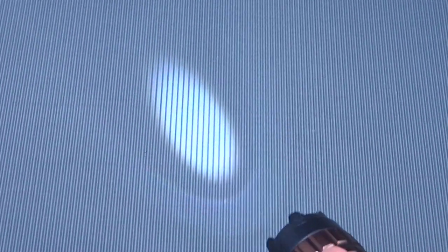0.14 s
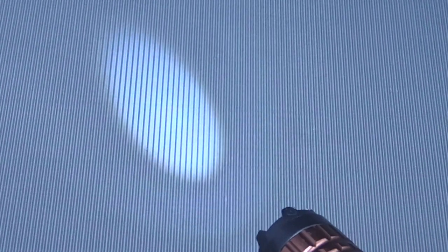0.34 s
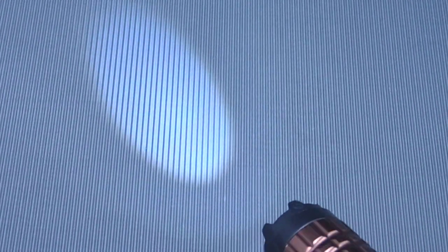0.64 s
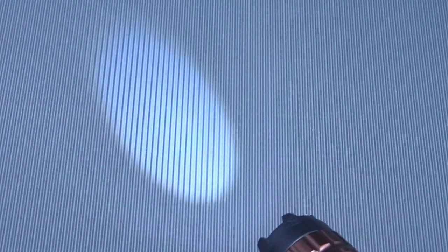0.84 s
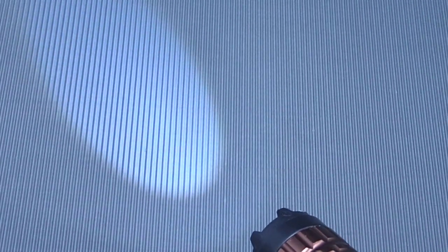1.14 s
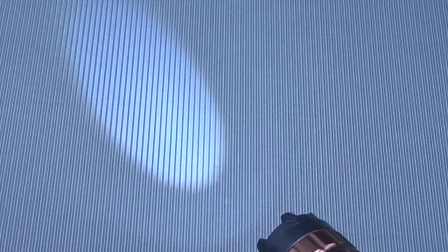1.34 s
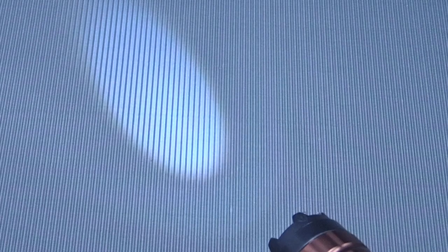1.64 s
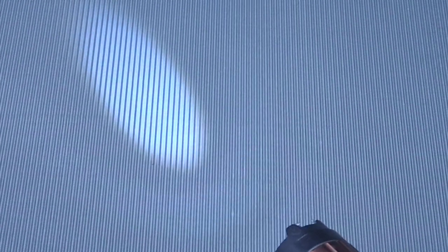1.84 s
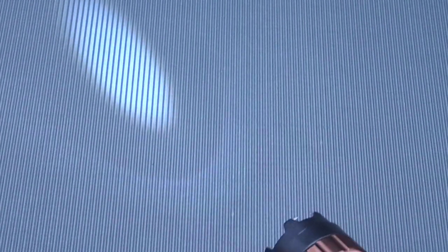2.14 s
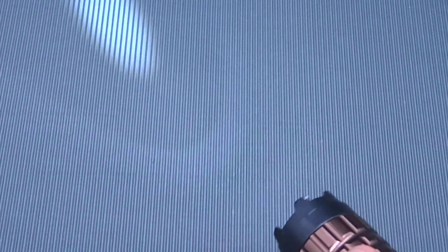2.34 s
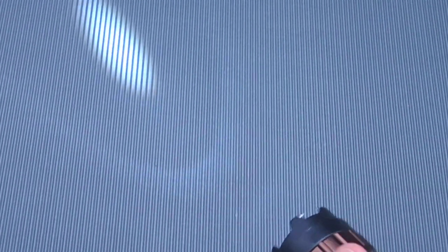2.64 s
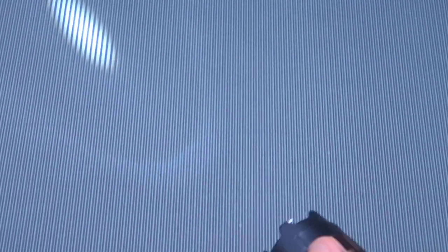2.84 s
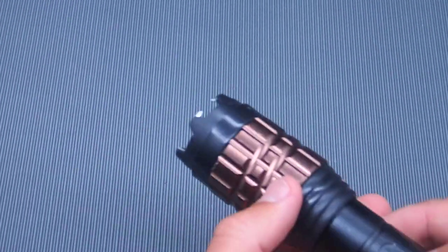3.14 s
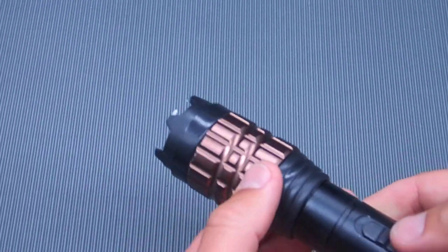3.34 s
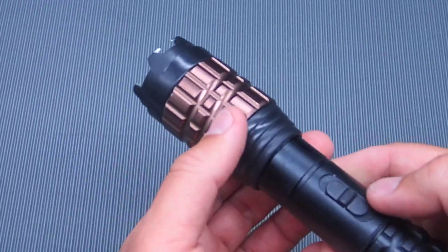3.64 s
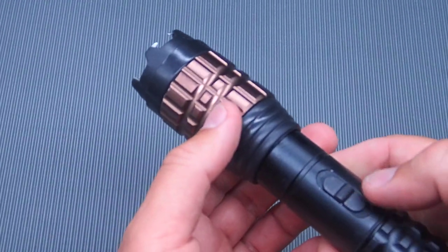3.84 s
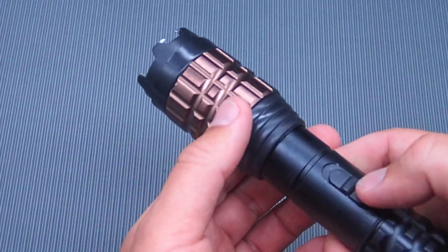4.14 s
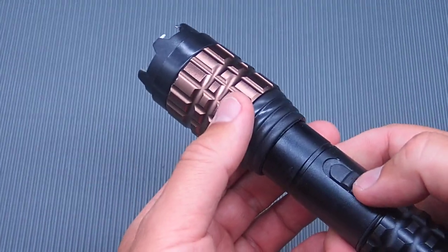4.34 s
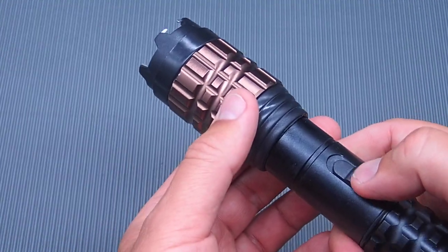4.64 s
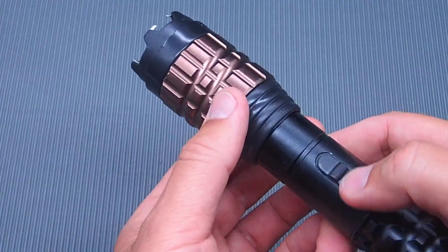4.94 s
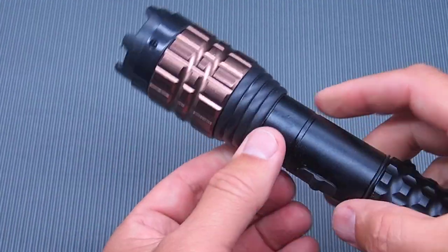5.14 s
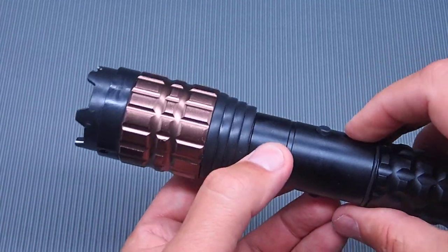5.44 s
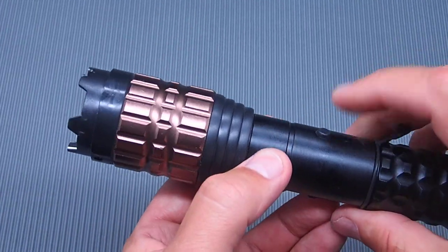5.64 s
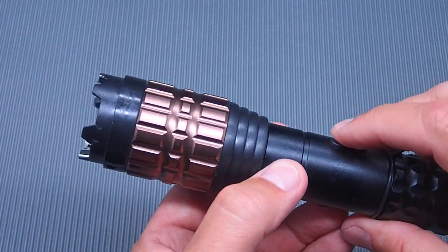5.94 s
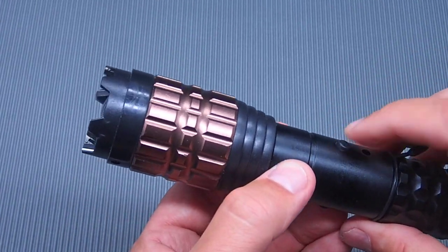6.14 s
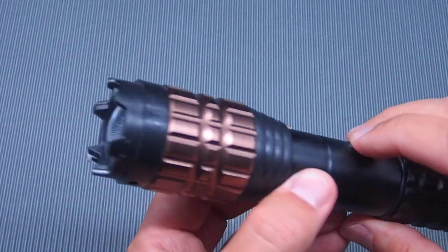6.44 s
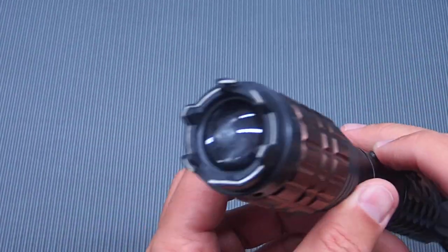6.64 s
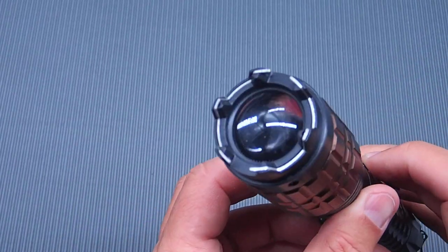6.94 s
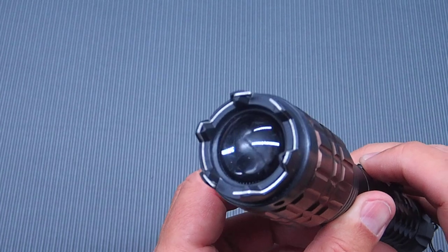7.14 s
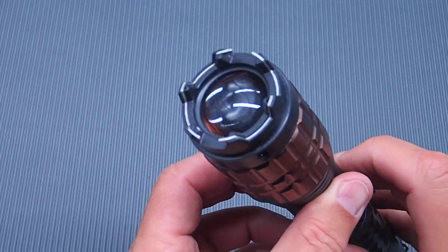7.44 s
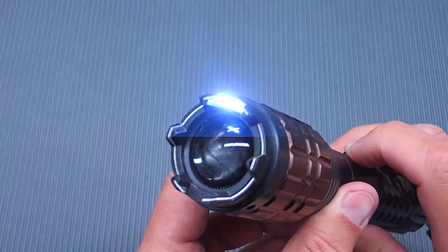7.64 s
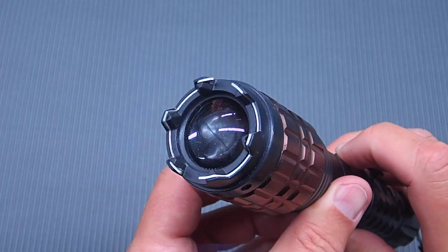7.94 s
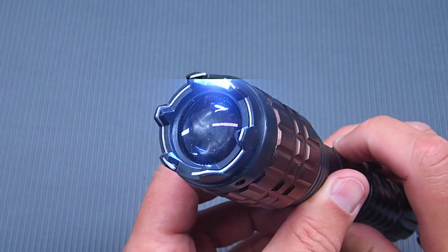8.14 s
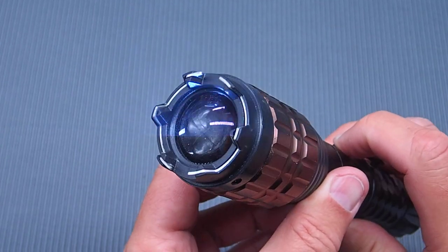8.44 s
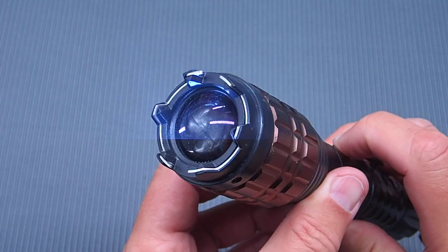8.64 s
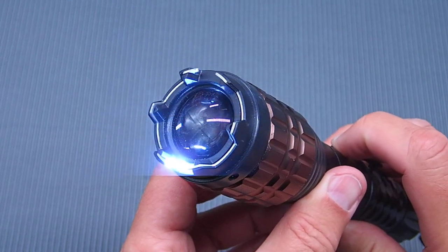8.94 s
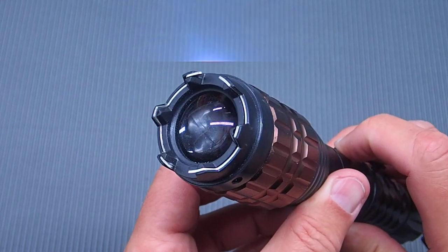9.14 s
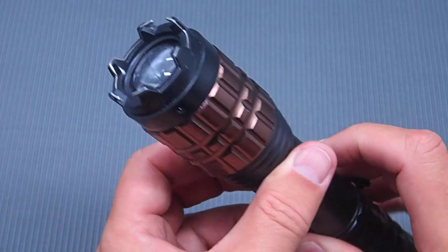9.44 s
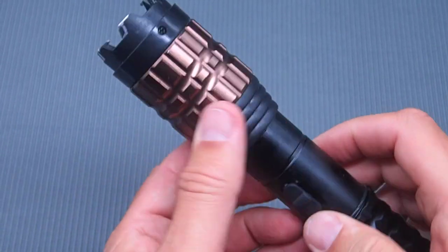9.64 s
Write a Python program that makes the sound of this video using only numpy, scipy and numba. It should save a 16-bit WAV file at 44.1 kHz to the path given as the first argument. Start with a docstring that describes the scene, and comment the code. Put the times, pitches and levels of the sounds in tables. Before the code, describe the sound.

From about 0.2 to 2.8 seconds, the focus ring of a stun gun flashlight is twisted eight times, each twist a quick cluster of bright, scratchy ticks, with a few light clicks on the barrel among them. Around 3 to 3.5 seconds, fingers slide softly along the barrel with a small tap. A slide switch snaps sharply at 4.7 seconds. From 5 to 7 seconds there are faint rubs and light taps as the grip shifts. Just after 7 seconds the trigger clicks and the stun gun fires at once: a hard first crack, then a loud, bright electric crackle of some forty sparks a second, steady and buzzing, with a slight thump beneath. It is by far the loudest sound and cuts off at 9.4 seconds, leaving faint hiss. Everything is close to the microphone in a small, quiet room.

```python
"""A stun gun built into a torch sparks some 43 times a second, close by in a small, quiet room.
Each time its capacitor fills, the air in the gap breaks down with a crack and a low thump.
Before the arc starts, the focus ring ticks through eight short twists by stick-slip friction,
a slide switch snaps, fingers shift their grip and the trigger clicks.
A limiter ducks the room noise under each loud sound."""
import sys
import numpy as np
from scipy import signal
from scipy.fft import rfft, irfft, next_fast_len
from scipy.io import wavfile
from numba import njit

SR = 44100
rng = np.random.default_rng(int(sys.argv[2]) if len(sys.argv) > 2 else 0)


def dump(signal):
    """Clip the signal to [-1, 1] and save it as 16-bit WAV at the path in sys.argv[1]."""
    limited = np.clip(np.atleast_2d(signal).T, -1, 1)
    pcm = np.round(limited * 32767).astype(np.int16)
    wavfile.write(sys.argv[1], SR, pcm)


N = 432621
TIME = np.arange(N) / SR
TAIL = TIME[:SR // 3]  # time axis of one short sound
FFT_SIZE = next_fast_len(N + SR)
FREQ = np.maximum(np.arange(FFT_SIZE // 2 + 1) * SR / FFT_SIZE, 1)

# spectrum of room air and microphone hiss: (frequency [Hz], relative level [dB])
AIR_SPECTRUM = [(25, 4), (91, 3), (220, 0), (537, -2), (1200, -5.5), (1650, -7), (1900, -13.5), (2770, -18),
                (3170, -14.5), (4200, -25), (4750, -7.5), (6500, -9.5), (8000, -6), (9500, -13),
                (15500, -15)]
# microphone response, with its strong port resonance: (frequency [Hz], gain [dB])
MIC_RESPONSE = [(30, -32.5), (400, -34.5), (1300, -25.5), (1900, -26.5), (3100, -24), (4220, -22),
                (4600, -9.5), (5100, -0.5), (5650, 1.5), (6700, -6), (7950, -8), (9300, -15.5),
                (11400, -17.5), (15300, -17)]
# stereo width of the room and of near sounds: (frequency [Hz], side relative to mid [dB])
ROOM_WIDTH = [(60, -7), (200, -2), (700, -0.5), (2400, -2), (4400, -1.5), (8000, 1), (15000, -0.5)]
NEAR_WIDTH = [(100, -2), (400, 0), (1300, -2.5), (2500, -12), (5200, -8), (8000, -3), (13000, -1)]
# a faint tick dying away at the very start, then strokes of skin along the barrel:
# (time [s], length [s], relative level [dB])
TICK_AND_STROKES = [(0, 0.0071, -45.5), (2.979, 0.2, -45), (3.3, 0.17, -47.5), (5.185, 0.15, -46),
                    (5.42, .03, -59), (5.82, .015, -47.5), (5.98, .03, -54), (6.48, .05, -52),
                    (6.61, 0.18, -48), (6.863, .05, -55)]
# snaps and taps on the barrel: (time [s], relative level [dB], decay time [s], knock against snap [dB])
BARREL_CLICKS = [(.551, -25, 0.0036, -25), (1.851, -27.5, 0.0079, -14.5), (2.171, -27.5, 0.0034, -15),
                 (2.611, -25.5, 0.0089, -20), (3.348, -29.5, 0.0037, -10), (4.6832, -7, 0.006, -53),
                 (4.688, -16.5, 0.0023, -49), (4.957, -44, 0.0071, -18), (5.208, -36, 0.0074, -18),
                 (5.224, -41, .004, -6), (5.819, -38, 0.0057, -9), (5.98, -41, .005, -22),
                 (6.074, -33.5, 0.0073, -36), (6.299, -31, 0.005, -8), (6.745, -51, 0.0076, 4),
                 (6.829, -30.5, 0.0094, -1.5), (7.0424, -13.5, 0.0025, -21), (7.048, -20, .005, -22)]
# twists of the focus ring:
# (tick level [dB], change from first tick to last [dB], drag level [dB], tick times [s])
TWISTS = [(-5.5, -3, -19.5, (.216, .235, .255, .303, .372)), (-3, -0.5, -11.5, (.595, .614, .637, .673)),
          (-0.5, -4.5, -19, (.893, .913, 0.94)),
          (-8, 4.5, -36.5, (1.249, 1.289, 1.337, 1.359, 1.383, 1.424)),
          (-5.5, -2, -19, (1.681, 1.710, 1.742, 1.781)), (-9, 2.5, -22, (2.009, 2.037, 2.070, 2.100)),
          (-6.5, -8.5, -23, (2.334, 2.355, 2.384, 2.425)), (-8, -3.5, -20, (2.652, 2.684, 2.711))]
# modes of the barrel and of the ring: (frequency [Hz], bandwidth [Hz], relative gain [dB])
BARREL_MODES = [(1520, 460, 10), (3600, 4100, 8), (5100, 320, 2), (6400, 3100, -1), (9200, 1400, -44.5),
                (15000, 2000, -6.5)]
RING_MODES = [(850, 74, 8.5), (1510, 1100, 0.5), (3050, 210, -3), (4520, 114, 3.5), (5220, 310, 8.5),
              (6160, 5700, -0.5), (12890, 810, 7.5)]
# crown and microphone port modes rung by sparks: (frequency [Hz], bandwidth [Hz], relative gain [dB])
ARC_MODES = [(5180, 300, -17), (5720, 30, -1), (5820, 310, -16.5), (8006, 220, 0.5), (10100, 130, -11),
             (15700, 440, 0.5)]
# speed of the capacitor's recharge: (time [s], spark rate [1/s])
SPARK_RATE = [(7.06, 39.7), (7.26, 43.4), (7.66, 43.3), (7.72, 45.6), (8.17, 40.8), (8.24, 43.2),
              (8.54, 45.7), (9.2, 40.15), (9.4, 41.8)]
# strength of the arc ahead of the limiter: (time [s], relative level [dB], extra gain of the thump [dB])
ARC_STRENGTH = [(7.06, 8, -21), (7.42, 29.5, -19.5), (7.8, 34, -22), (9.4, 22.5, -21.5)]


def undb(db):
    """Amplitude ratio of a level in decibels."""
    return 10 ** (np.asarray(db) / 20)


def curve(rows, column=1):
    """Linear interpolation of a table column over time."""
    rows = np.array(rows)
    return np.interp(TIME, rows[:, 0], rows[:, column])


def colour(points):
    """Minimum-phase response through (frequency [Hz], gain [dB]) points."""
    hz, db = np.transpose(points)
    gain = undb(np.interp(np.log(FREQ), np.log(hz), db))
    cepstrum = irfft(np.log(gain), FFT_SIZE)
    cepstrum[1:FFT_SIZE // 2] *= 2
    cepstrum[FFT_SIZE // 2 + 1:] = 0
    return np.exp(rfft(cepstrum))


def resonance(hz, width_hz):
    """Response of a damped oscillator, with gain 1 at resonance."""
    return 1 / (1 + 1j * (FREQ ** 2 - hz ** 2) / (FREQ * width_hz))


def body(modes):
    """Modal superposition: an object responds as the sum of its resonances."""
    return sum(undb(db) * resonance(hz, width) for hz, width, db in modes)


def stereo(pair, response, width):
    """Mid-side stereo: a pair is filtered at unit power gain; sum and difference give left and right."""
    rms_gain = np.sqrt(np.mean(np.abs(response) ** 2))
    mid, side = rfft(pair, FFT_SIZE) * response / rms_gain
    return irfft([mid + side * width, mid - side * width], FFT_SIZE)[:, :N]


def add(track, time_s, sound):
    """Superposition of a short sound on a track."""
    start = max(int(time_s * SR), 0)
    part = track[:, start:start + sound.shape[1]]
    part += sound[:, :part.shape[1]]


def burst(decay_s, near_db, near_t60, room_db, room_t60, rise=0.6):
    """Incoherent sounds add in power: a noise burst, reflections from nearby surfaces, the faint room."""
    direct = np.exp(-TAIL / decay_s)
    near = undb(near_db - 60 * TAIL / near_t60)
    room = undb(room_db - 60 * TAIL / room_t60)
    onset = 1 - np.exp(-TAIL / (rise * decay_s))  # a longer burst sets in more softly
    return onset * np.sqrt(direct ** 2 + near ** 2 + room ** 2) * rng.standard_normal((2, len(TAIL)))


def roughness(samples, grain_samples, spread_db):
    """Random amplitude modulation: each grain of friction has its own level."""
    levels_db = spread_db * rng.standard_normal(samples // grain_samples + 1)
    return undb(np.repeat(levels_db, grain_samples)[:samples])


def room_air(level_db=-52.5):
    """Stationary noise: room air and microphone hiss form the background."""
    noise = rng.standard_normal((2, N))
    return undb(level_db) * stereo(noise, colour(AIR_SPECTRUM), colour(ROOM_WIDTH))


def envelope(start_s, length_s, rise_share=0.34, release_s=0.05):
    """Amplitude envelope: linear rise, hold, exponential decay."""
    age = TIME - start_s
    swell = np.clip(age / (rise_share * length_s), 0, 1)
    return swell * np.exp(-np.maximum(age - length_s, 0) / release_s)


def tick_and_fingers(mic, width):
    """Sliding friction: after a faint opening tick, skin drags over the ribbed barrel in uneven grains."""
    grains = roughness(N, grain_samples=128, spread_db=2.5)
    friction = rng.standard_normal((2, N)) * grains / np.std(grains * rng.standard_normal(N))
    skin = colour([(300, 10.5), (1500, 3.5), (3500, 1.5), (5400, -4.5), (8000, -7.0), (14000, -12.0)])
    level = sum(undb(db) * envelope(start_s, length_s) for start_s, length_s, db in TICK_AND_STROKES)
    return stereo(friction * level, mic * skin, width)


def barrel_clicks(mic, width, gain_db=3):
    """Impact excitation: switches and fingertips ring the barrel; softer blows bring out its hollow."""
    snaps, knocks = np.zeros((2, 2, N))
    for time_s, db, decay_s, knock_db in BARREL_CLICKS:
        impact = burst(decay_s, near_db=-11.5, near_t60=0.081, room_db=-35.5, room_t60=0.16)
        blow = undb(db + gain_db) * impact
        add(snaps, time_s, blow)
        add(knocks, time_s, undb(knock_db) * blow)
    hollow = resonance(hz=1170, width_hz=750) ** 2
    return stereo(snaps, mic * body(BARREL_MODES), width) + stereo(knocks, mic * hollow, width)


def slip(decay_s, rise=0.29):
    """Friction transient: one gritty scrape of the ring, with its reflections."""
    grit = roughness(len(TAIL), grain_samples=50, spread_db=1.5)
    return grit * burst(decay_s, near_db=-8, near_t60=.075, room_db=-35, room_t60=.22, rise=rise)


def focus_ring(mic, width, gain_db=3, scatter_db=0.9, drag_lead_s=.014):
    """Stick-slip friction: the ring drags, breaks free and ticks on; each slip excites its modes."""
    snap_db, scrape_db = -1, -6
    break_free_db, stopping_db = 2.5, -2  # the first snap is harder; the last tick softens as the hand stops
    slips = np.zeros((2, N))
    for db, change_db, drag_db, ticks in TWISTS:
        add(slips, ticks[0] - drag_lead_s, undb(drag_db) * slip(decay_s=0.028, rise=0.69))
        for time_s, tick_db in zip(ticks, np.linspace(db, db + change_db, len(ticks))):
            first, last = time_s == ticks[0], time_s == ticks[-1]
            size = undb(tick_db + stopping_db * last + scatter_db * rng.standard_normal())
            snap = undb(snap_db + break_free_db * first) * slip(decay_s=0.0017)
            scrape = undb(scrape_db) * slip(decay_s=0.0096)
            add(slips, time_s, size * (snap + scrape))
    return undb(gain_db) * stereo(slips, mic * body(RING_MODES), width)


def spark_times(start_s=7.0637, end_s=9.40, jitter_s=.0007):
    """Relaxation oscillation: a spark jumps each time the capacitor is full, a little early or late."""
    cycles = np.cumsum(curve(SPARK_RATE) * (TIME > start_s) * (TIME < end_s)) / SR
    times = np.searchsorted(cycles, np.arange(1, cycles[-1])) / SR
    return np.r_[start_s, times + jitter_s * rng.standard_normal(len(times))]


def crack():
    """Impulsive source: one abrupt crack with its reflections."""
    return burst(.008, near_db=-3, near_t60=.075, room_db=-41, room_t60=.26, rise=.005)


def sparks(mic, width, hop_chance=.3, wander=0.29, scatter_db=0.73, overload=2.07, thump_s=0.0073):
    """Dielectric breakdown: the arc crosses one of two gaps, each with its own echo pattern."""
    gap_cracks = [crack(), crack()]
    # the heated air also thumps: short-lived reflections headed by one pressure pulse
    thump_decay = np.exp(-TAIL / thump_s) / 2
    gap_thumps = thump_decay * rng.standard_normal((2, 2, len(TAIL)))
    gap_thumps[:, 0, 0] += 6
    strength_db, gap = curve(ARC_STRENGTH), 0
    cracks, thumps = np.zeros((2, 2, N))
    for time_s in spark_times():
        size = undb(strength_db[int(time_s * SR)] + scatter_db * rng.standard_normal())
        pressure = gap_cracks[gap] + wander * crack()  # the arc never takes the same path twice
        add(cracks, time_s, size * np.tanh(overload * pressure))  # its onset overloads the capsule
        thump = gap_thumps[gap] + thump_decay * rng.standard_normal((2, len(TAIL)))
        add(thumps, time_s, size * thump)
        if rng.random() < hop_chance:
            gap = 1 - gap
    thumps *= undb(curve(ARC_STRENGTH, column=2))
    bright = colour([(100, -26.5), (600, -11.5), (2000, -1), (4000, -2.5), (5400, -3.0),
                     (9500, 1.5), (14000, 2.5)])
    ringing = 1 + body(ARC_MODES)
    low = colour([(100, -9.0), (380, 2.0), (650, -1.5), (1300, -1.0), (2000, -17.0), (4500, -34)])
    return stereo(cracks, mic * bright * ringing, width) + stereo(thumps, mic * low, width)


def scene(lean_db=1.0):
    """Level difference sets direction: handling and room lean to the left, the arc is straight ahead."""
    mic, width = colour(MIC_RESPONSE), colour(NEAR_WIDTH)
    handling = focus_ring(mic, width) + barrel_clicks(mic, width) + tick_and_fingers(mic, width)
    balance = undb([[lean_db], [-lean_db]])
    return (handling + room_air()) * balance + sparks(mic, width)


@njit
def gain_reduction(excess, attack, max_growth, release):
    """Envelope following: the reduction climbs to each peak at a limited speed and relaxes towards 1."""
    reduction, held = np.empty(len(excess)), 1.
    for i in range(len(excess)):
        if excess[i] > held:
            held = min(held + (excess[i] - held) * attack, held * max_growth)
        else:
            held += (1 - held) * release
        reduction[i] = held
    return reduction


def record(dry, ceiling_db=-10.5, attack_s=0.0015, slew_db_per_s=60000, release_s=0.079):
    """Peak limiting: the gain drops fast and recovers slowly; the first spark outruns it and clips."""
    low_cut_hz, top_hz = 200, 15800
    excess = np.abs(dry).max(axis=0) / undb(ceiling_db)
    max_growth = float(undb(slew_db_per_s / SR))
    reduction = gain_reduction(excess, 1 / (attack_s * SR), max_growth, 1 / (release_s * SR))
    limited = np.clip(dry / reduction, -1, 1)
    low_cut = signal.butter(1, low_cut_hz, "high", fs=SR, output="sos")
    high_cut = signal.ellip(12, .2, 70, top_hz, fs=SR, output="sos")
    return signal.sosfilt(np.vstack([low_cut, high_cut]), limited)


dry = scene()
out = record(dry)
dump(out)
```